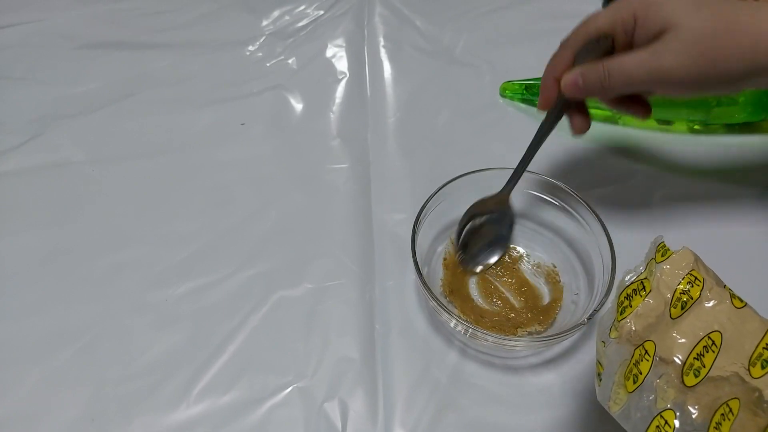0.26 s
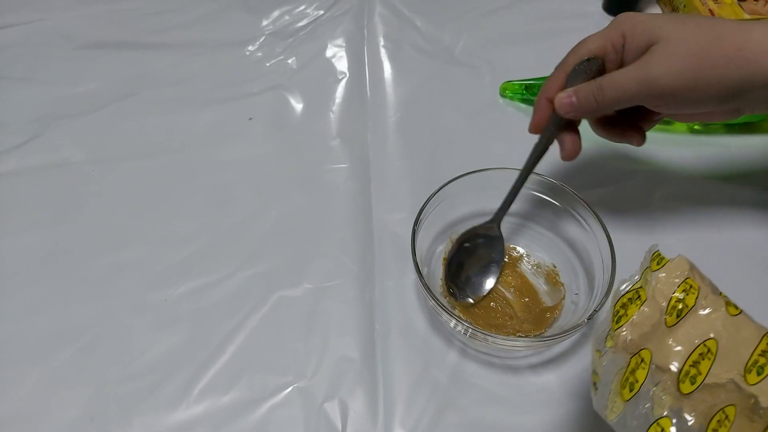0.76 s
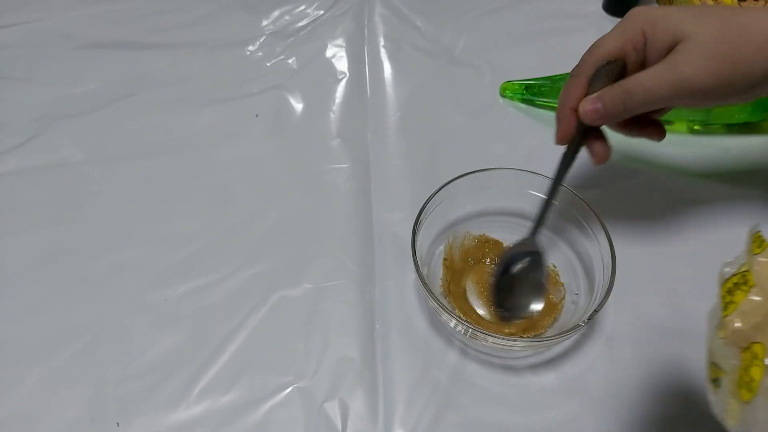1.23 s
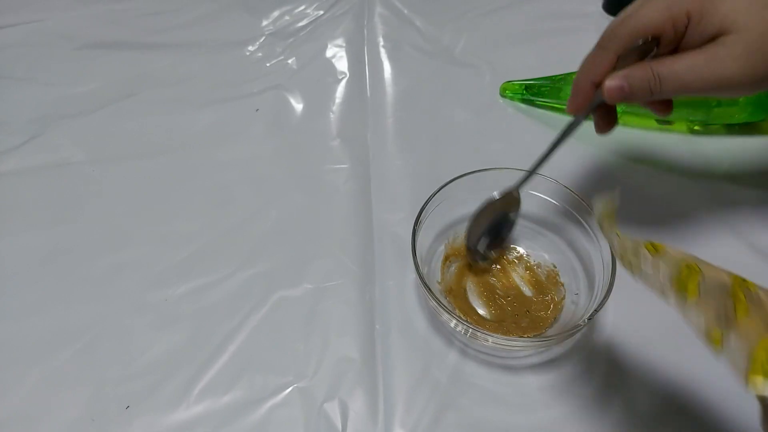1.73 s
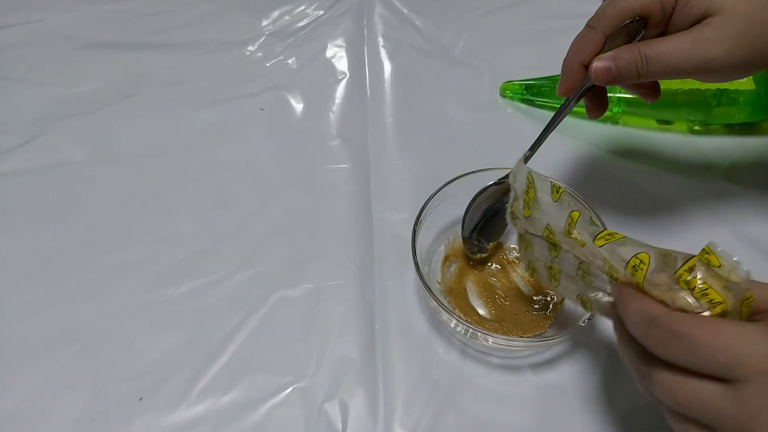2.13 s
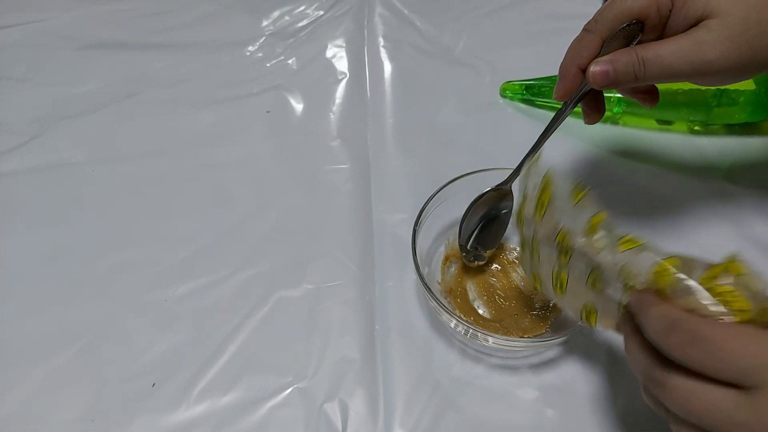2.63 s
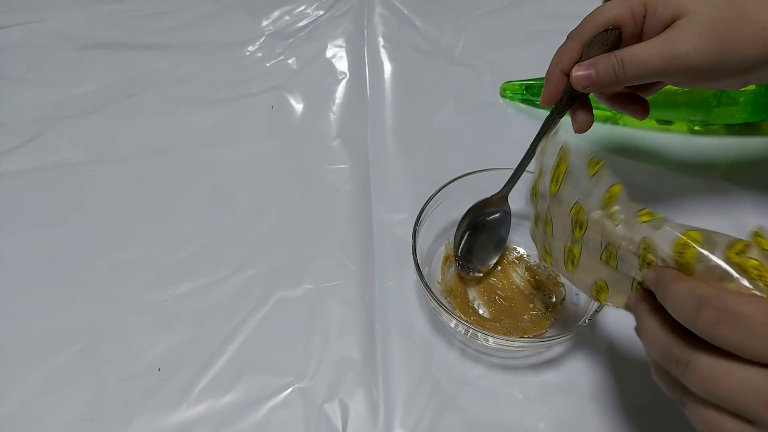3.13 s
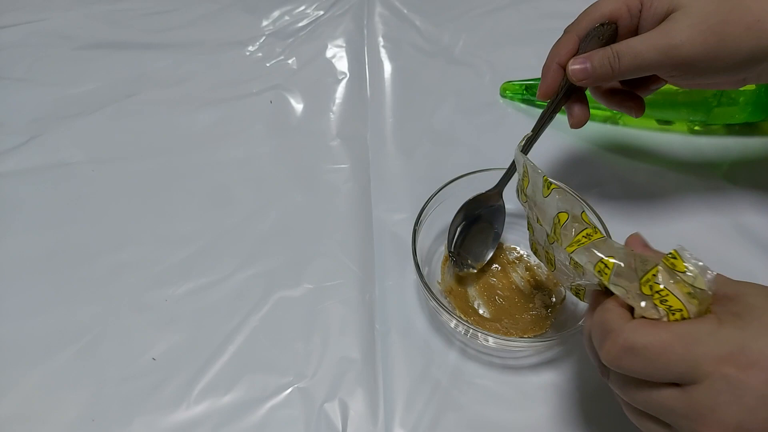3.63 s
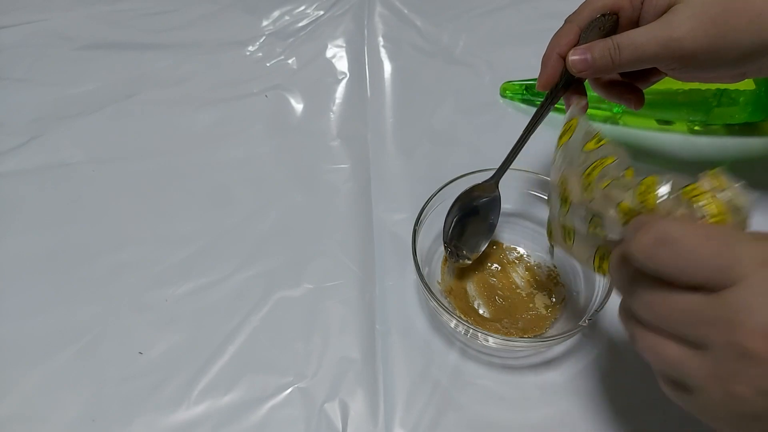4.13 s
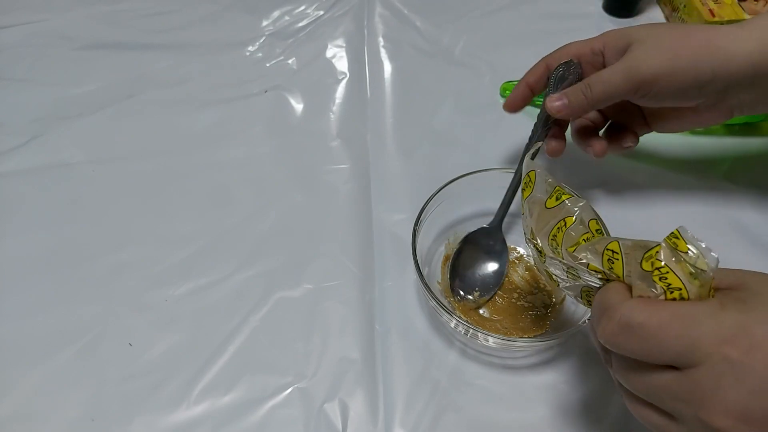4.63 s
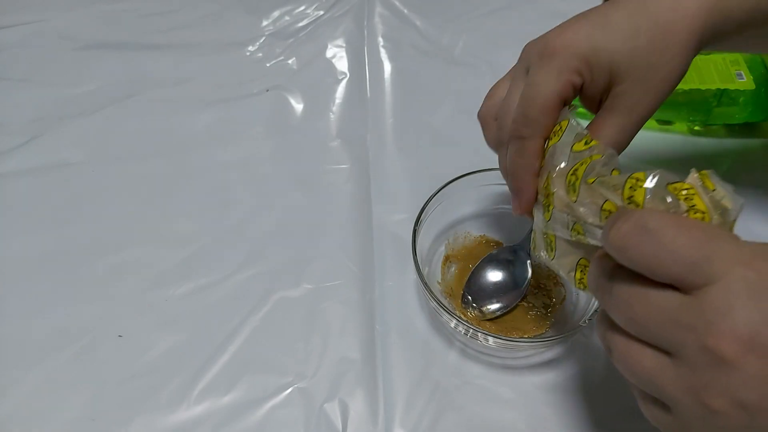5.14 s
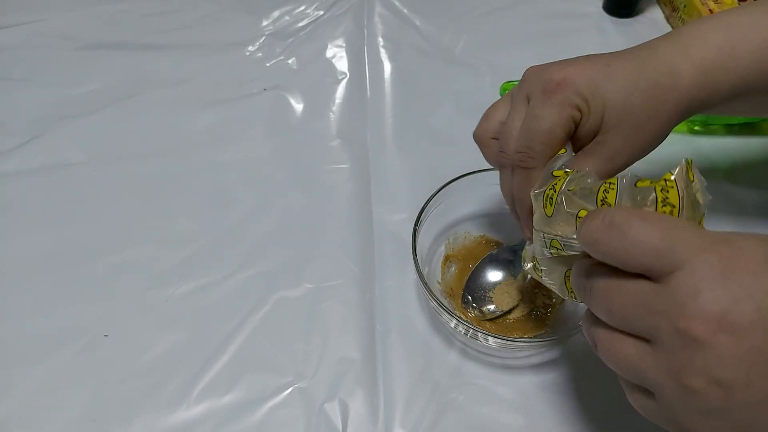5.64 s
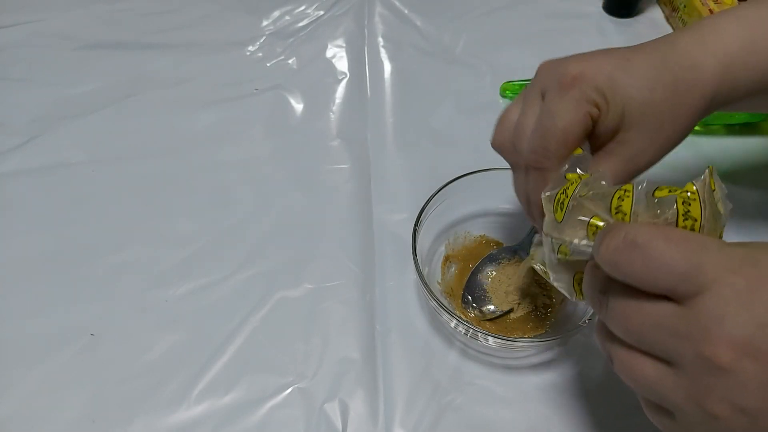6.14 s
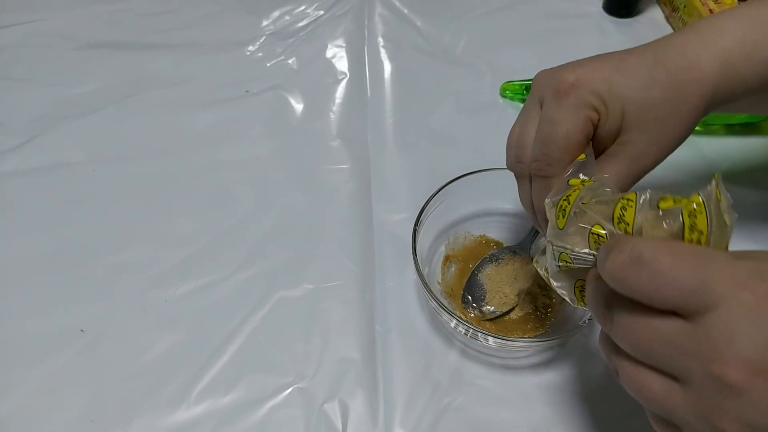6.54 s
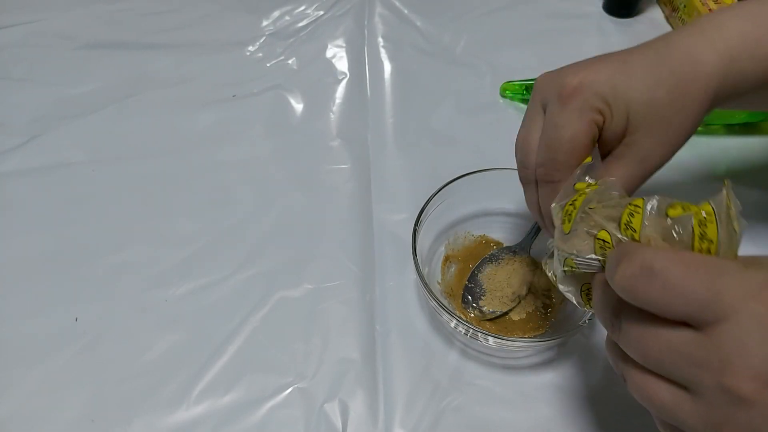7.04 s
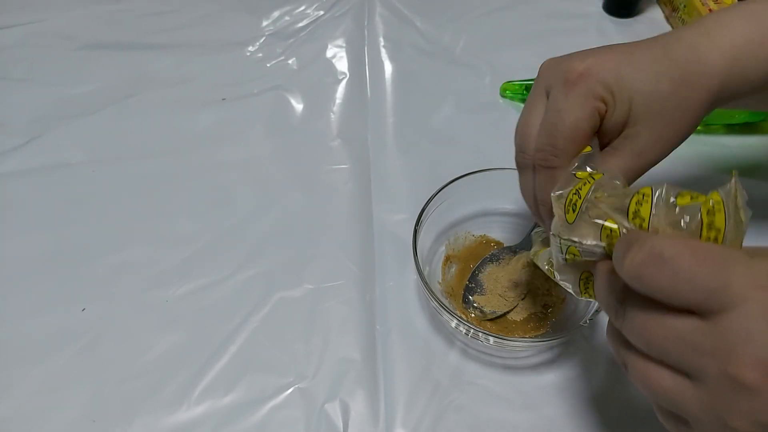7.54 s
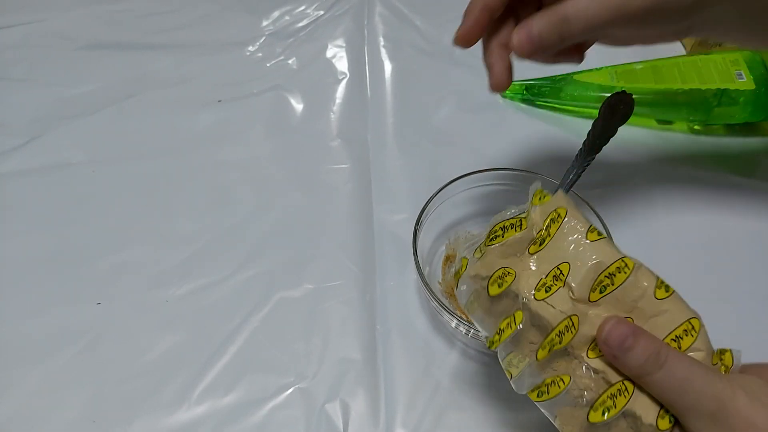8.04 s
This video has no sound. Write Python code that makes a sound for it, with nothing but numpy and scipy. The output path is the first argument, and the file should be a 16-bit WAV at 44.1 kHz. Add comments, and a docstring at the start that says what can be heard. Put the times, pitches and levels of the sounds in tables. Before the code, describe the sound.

Gritty spoon strokes and small taps in a glass bowl come first, ending with a clink on its wall. Light plastic shakes follow, growing into dense crackling, then three quick chattering steel-on-glass clinks. After another burst of crisp film snaps, the packet is squeezed about six times a second, growing stronger, then lifted away with slight rustles. Close stereo pickup, short room echo, low hum and faint hiss.

```python
"""A plastic packet is tipped over a glass bowl and squeezed in pulses: its creases snap and rustle.
Each snap is a click with a dying flutter; fine crumpling is many small ones at random moments.
A steel spoon stirs paste in the bowl, knocks its wall and is let go on the rim: short bursts
pass through the damped spoon's resonances, and decaying sines make the ring of glass and steel.
A motor hums over rumble and hiss in a small room; two microphone ports listen from close above."""
import sys
import numpy as np
from scipy import signal
from scipy.fft import rfft, irfft
from scipy.io import wavfile

SR = 44100
rng = np.random.default_rng(int(sys.argv[2]) if len(sys.argv) > 2 else 0)


def output_pcm(signal):
    """Save a mono or channel-first signal as 16-bit PCM at the path in sys.argv[1].

    Samples are clipped to [-1, 1] before scaling.
    """
    pcm = np.clip(np.atleast_2d(signal).T, -1, 1) * 32767
    wavfile.write(sys.argv[1], SR, np.round(pcm).astype(np.int16))


N = 365148

# Tone of the plastic film, also used for the rasp of the spoon's edge: (pitch_hz, gain_db)
FILM_TONE = [(120, -18), (330, -18), (650, -16), (1000, -11.5), (1600, 1), (1980, 1), (2350, 5),
             (4200, 7.5), (6000, 4), (7600, 3.5), (9800, -7), (12000, -4), (15500, -7.5)]
# Squeezes that coax the powder out, about six a second: (start_s, energy_db,
# highs_against_mids_db, tightening_crease_energy_db, spring_back_s, spring_back_energy_db)
SQUEEZES = [(5.7616, -2.5, -6.5, -25, 5.8451, -0.5), (5.9644, 1, -5.5, -13.5, 6.0532, -8),
            (6.109, 0.5, -6.5, -23, 6.1903, -5.5), (6.275, 2.5, -10, -4.5, 6.3795, 1),
            (6.4761, 1, -10, -2, 6.5709, -4.5), (6.6312, 3.5, -3, -27, 6.7372, -4),
            (6.7964, 3, 0.5, -13, 6.892, -6), (6.965, 6, -0.5, -5.5, 7.048, -1.5),
            (7.138, 6, -5.5, -6.5, 7.2158, -1), (7.3082, 6.5, -5.5, -4.5, 7.4091, -7),
            (7.4757, 5, -3.5, -6.5, 7.553, -4.5), (7.6553, -1.5, 0.5, -3.5, 7.757, -11)]
# Strokes of the spoon through the paste: (start_s, length_s, level_db before layer gains, groan_hz)
STROKES = [(0, 0.0067, -37, 3600), (0.084, .022, -40.5, 1730), (0.213, 0.068, -51, 3640),
           (0.325, 0.075, -39, 3660), (0.566, 0.13, -47.5, 2980), (0.701, 0.07, -56.5, 3600),
           (0.867, 0.2, -59, 3400), (1.044, 0.037, -42.5, 4230), (1.181, 0.051, -45, 4630),
           (1.46, .12, -50.5, 3300), (1.608, 0.057, -47.5, 3570)]


def amp(db):
    """Turns decibels into gain."""
    return 10 ** (np.asarray(db) / 20)


def unit(x):
    """Scales each channel of a sound to energy one."""
    return x / np.sqrt(np.sum(x ** 2, -1, keepdims=True) + 1e-20)


def read(points, hz):
    """Reads a (pitch_hz, value) table with straight lines on a log-frequency axis."""
    f, value = np.transpose(points)
    return np.interp(np.log(hz + 1), np.log(f + 1), value)


def level(rows):
    """Turns (time_s, level_db) points into gain for every sample, silent outside their span."""
    s, db = np.transpose(rows)
    return np.interp(np.arange(N) / SR, s, amp(db), left=0, right=0)


def pushes(rows, attack_s, release_s):
    """Pushes of the hand (start_s, length_s, level_db) as gain: each builds up, holds and dies away."""
    t = np.arange(N) / SR
    total = np.zeros(N)
    for s, length, db, *_ in rows:
        build_up = np.clip((t - s) / attack_s, 0, 1)
        die_away = np.exp(-np.maximum(t - s - length, 0) / release_s)
        total += amp(db) * build_up * die_away
    return total


def add(mix, s, sound):
    """Mixes a sound into both channels at time s."""
    part = mix[:, max(round(s * SR), 0):][:, :sound.shape[1]]
    part += sound[:, :part.shape[1]]


def convolve(x, response):
    """Filters both channels and keeps the scene's length."""
    return signal.oaconvolve(x, response, axes=1)[:, :N]


def causal(gain):
    """Minimum-phase spectrum with this gain, so that a filtered click starts at once."""
    both_sides = np.r_[gain, gain[-2:0:-1]]
    log_gain = np.log(np.maximum(both_sides, 1e-5))
    return np.exp(np.conj(signal.hilbert(log_gain)))[:len(gain)]


def bins(size=2048):
    """Frequencies of a short spectrum, in Hz."""
    return np.fft.rfftfreq(size, 1 / SR)


def burst(decay_s, spike, alike_hz=2600, lag_ms=0.093, size=2048):
    """Spectra of a click and its dying flutter at both ports: alike in the bass, later on the left."""
    t, hz = np.arange(size) / SR, bins(size=size)
    envelope = np.exp(-t / decay_s) * (1 - np.exp(-t * SR / 10))
    flutter = unit(rng.standard_normal((3, size)) * envelope)
    flutter[:, 2] += spike  # the first crack, early in the flutter
    z = rfft(flutter)
    # the third flutter is shared; the other two belong to one port each
    same = 1 / np.sqrt(1 + (hz / alike_hz) ** 2)
    z = same * z[2] + np.sqrt(1 - same ** 2) * z[:2]
    z[0] *= np.exp(-2j * np.pi * hz * lag_ms / 1e3)
    return z


def grains(per_s, spread_db):
    """Random clicks of very uneven size, with mean power one."""
    size = amp(spread_db * np.minimum(rng.exponential(1, N), 3.5))
    return np.sqrt(N) * unit(size * (rng.random(N) < per_s / SR))


def snap(low_db, high_db, decay_s):
    """One crease flips: large slack facets sound low, small taut ones bright."""
    hz = bins()
    z = burst(decay_s, spike=.8) * causal(amp(read(FILM_TONE, hz)))
    power = np.mean(abs(z) ** 2, 0)
    # energy in the lows, mids and highs, then tilt towards the wanted balance
    low, mid, high = 10 * np.log10(np.bincount(np.digitize(hz, [1800, 6000]), power))
    slack, taut = low_db - low + mid, high_db - high + mid
    tilt = [(650, 1.42 * slack), (1250, 0.85 * slack), (2400, 0.027), (4800, 0.0074), (7500, taut)]
    return unit(irfft(z * causal(amp(read(tilt, hz)))))


def squeeze_snaps():
    """Each squeeze tightens the film, flips one big crease and lesser ones, then lets it spring back."""
    # Lesser creases as the film starts to yield, buckles further and settles:
    # (after_squeeze_s, energy_against_squeeze_db, highs_against_mids_db)
    lesser_creases = [(-.003, -22.5, -17), (0.0176, -9.5, -3.5), (.128, -11, -10)]
    tighten_s, scatter_s = .0245, 0.00062  # lead of the tightening crease; scatter of the lesser ones
    tighten_high_db, spring_high_db = -4, -3.5  # highs against mids
    taut_low_db, low_spread_db = -13.5, 2.5  # lows against mids, and their random spread
    creases = []
    for s, db, high_db, tighten_db, back_s, back_db in SQUEEZES:
        creases.append((s - tighten_s, tighten_db, tighten_high_db))
        creases.append((s, db, high_db))
        creases.append((back_s, back_db, spring_high_db))
        for after_s, lesser_db, bright_db in lesser_creases:
            lesser_s = s + after_s + scatter_s * rng.standard_normal()
            creases.append((lesser_s, db + lesser_db, bright_db))
    return [(s, db, taut_low_db + low_spread_db * rng.standard_normal(), high_db)
            for s, db, high_db in creases]


def packet(knock_s=0.0045, neighbour_db=-13, delay_s=0.0066):
    """Creases of the film snap loudly; its whole bulging wall knocks as short dying sines."""
    # Loudest creases as the packet is turned and gripped:
    # (start_s, energy_db, lows_against_mids_db, highs_against_mids_db)
    loud_snaps = [(1.953, -20, -38, 13), (2.714, -18, 8.5, 2), (2.9418, -18, 8.5, -10),
                  (3.011, -16, 5.5, -11), (3.2069, -15, 5, -10), (3.2582, -11.5, 6, -4),
                  (3.3465, -15, 1.5, -12), (3.3791, 0.5, 0.5, 2.5), (3.3941, -2, -9.5, -3),
                  (3.4382, -8, 7, -4), (3.4594, -10, 4, -5), (3.525, -5, 2, -6), (3.608, -4.5, 1, -3),
                  (3.621, 5, -4.5, -7.5), (3.669, -5, -16, -5), (3.6988, -5, -4.5, -2),
                  (3.7446, -5, -1.5, -10), (3.841, 4, -4.5, -6.5), (3.8629, 5.5, -1.5, -6),
                  (3.8888, 1.5, -8, -8), (3.9167, 0.5, 1, -13), (4.0232, -11, 0, -10.5),
                  (4.069, -1, -10, -4), (4.1784, .5, -6.5, -6), (4.521, -13, -9, -14.5),
                  (5.1803, -12.5, 2, -29), (5.2549, -10, 2, 0), (5.271, -5.5, -2, -15),
                  (5.2911, 4.5, -1.5, -10.5), (5.3297, -5.5, -3, -17), (5.3435, 0.5, -8, 0),
                  (5.345, 7, -11, -7.5), (5.3616, -2, -2, -17), (5.3764, 0, -8, 0),
                  (5.418, -4.5, -24, -6.5), (5.519, -9, -13, -6), (5.5274, 7, -11, -10),
                  (5.551, 0.5, -11, -3.5), (7.9113, -12, 2, -23), (8.1039, -16, -1, -3)]
    # Soft knocks of the bulging packet as the powder shifts: (start_s, energy_db, pitch_hz)
    knocks = [(2.2438, -15.5, 600), (2.456, -19, 630), (2.514, -25, 1720), (2.645, -23.5, 1750),
              (2.658, -21, 610), (3.012, -23, 584), (3.166, -19, 614), (4.025, -7.5, 793),
              (5.228, -14.5, 1550), (7.86, -14, 683)]
    out, t = np.zeros((2, N)), np.arange(2048) / SR
    for s, db, low_db, high_db in loud_snaps + squeeze_snaps():
        add(out, s, amp(db) * snap(low_db, high_db, decay_s=0.0024))
        # each snap tips a neighbouring crease a moment later
        wait, size = rng.exponential(1), rng.uniform(.5, 2)
        neighbour = snap(low_db, high_db, decay_s=.001)
        add(out, s + delay_s * wait, size * amp(db + neighbour_db) * neighbour)
    for s, db, hz in knocks:
        knock = np.sin(2 * np.pi * hz * t) * np.exp(-t / knock_s)
        add(out, s, amp(db) * unit(knock)[None])
    return out


def crumple(effort, level_db, low_db, high_db, per_s, count=9):
    """Tiny creases, each with its own colour, give way as the fingers work the film."""
    out = np.zeros((2, N))
    clicks = effort * grains(per_s, spread_db=6.5)
    which = rng.integers(count, size=N)
    for k, (low, high) in enumerate(rng.standard_normal((count, 2))):
        crease = snap(low_db + 5 * low, high_db + 5 * high, decay_s=.0009)
        out += convolve((clicks * (which == k))[None], crease)
    return out * amp(level_db)


def packet_rustle():
    """Fine crumpling of the film follows the effort of the hands: shaken, loose, held or taut."""
    # Light shakes of the tipped packet: (start_s, length_s, level_db before layer gain)
    shakes = [(2.193, .014, -53.5), (2.3, 0.019, -47.5), (2.44, 0.02, -44.5), (2.51, 0.016, -56),
              (2.58, 0.022, -52), (2.64, 0.018, -55), (2.705, 0.028, -52), (3.0, 0.016, -53),
              (3.25, 0.013, -49)]
    # Gathering in one hand, gripping with the other, lifting away: (time_s, level_db before layer gain)
    gathering = [(3.17, -59), (3.365, -71), (3.41, -46), (3.57, -54), (3.9, -45), (4.05, -46.5),
                 (4.28, -66)]
    gripping = [(5.1, -58.5), (5.21, -56), (5.35, -39), (5.48, -49), (5.54, -44), (5.66, -75)]
    lifting = [(7.7, -73), (7.82, -53), (7.97, -75), (8.2, -66.5), (8.26, -52)]
    lead_s, length_s = 0.012, 0.026  # each squeeze's rustle starts just before its snap
    squeeze_rows = [(s - lead_s, length_s, db) for s, db, *_ in SQUEEZES]
    squeezing = pushes(squeeze_rows, attack_s=0.0066, release_s=0.16)
    shaking = pushes(shakes, attack_s=0.0023, release_s=0.017)
    holding = level(gripping) + level(lifting)
    shaken = crumple(shaking, level_db=3.5, low_db=3, high_db=-5.5, per_s=1500)
    loose = crumple(level(gathering), level_db=5, low_db=-4.5, high_db=-10.5, per_s=340)
    held = crumple(holding, level_db=2, low_db=-3, high_db=-7.5, per_s=300)
    taut = crumple(squeezing, level_db=-47.5, low_db=-5.5, high_db=-6, per_s=110)
    return shaken + loose + held + taut


def ring(place, damping=0):
    """Modes of glass and steel, weighted by where the blow lands; contact damps them (per s)."""
    # Ring of bowl and spoon together: (pitch_hz, time_to_fall_60_db_s, wall_blow_db, rim_blow_db)
    ring_modes = [(945, .6, -12, -20), (1340, .2, -5, -14), (2220, .36, -15, -4), (2455, .1, -18, 3),
                  (4002, .28, 0, -2), (4700, .08, -10, 0), (6112, .25, -12, 1), (6290, .13, 2, -12),
                  (6820, .06, -11, 2), (7580, .1, -1, -1), (8548, .2, -15, -3), (10280, .14, -7, -10),
                  (11060, .16, -11, -2), (11330, .05, -11, 1), (12550, .05, -2, -14), (13825, .15, 2, -4),
                  (14580, .09, -12, 2), (15150, .15, -6, -5)]
    t = np.arange(SR) / SR
    phases = 2 * np.pi * rng.random((len(ring_modes), 2, 1))
    modes = np.zeros((2, SR))
    for (hz, t60, wall, rim), phase in zip(ring_modes, phases):
        fading = amp(wall + place * (rim - wall) - 60 * t / t60)
        modes += fading * np.sin(2 * np.pi * hz * t + phase)
    return unit(modes * np.exp(-damping * t))


def clinks(ring_db=-8, clack_db=-1, chatter_per_s=600, damping=330, rasp=0.66, body_db=7, size=8192):
    """Steel meets glass in a buzz of tiny rebounds: a choked clack at each, then the free ring."""
    # Spoon striking the glass: (start_s, energy_db before layer gains, chatter_s, place 0 wall to 1 rim)
    strikes = [(1.4322, 1, .0015, 0), (4.6562, -1, .02, 1), (4.7201, -2.5, .021, 1), (4.7894, -3, .026, 1),
               (4.9066, -19, .008, 1)]
    out, t = np.zeros((2, N)), np.arange(size) / SR
    body = read([(900, body_db), (2500, 0)], bins())  # the bowl's weight fills out the low end
    for s, db, chatter_s, place in strikes:
        rebounds = rng.standard_normal(size) * (rng.random(size) < chatter_per_s / SR)
        rebounds[0] = 2
        rebounds = (rebounds * np.exp(-t / (2 * chatter_s)))[None]
        # the handle's edge rasps on the rim; on the wall the blow is cleaner
        edge_colour = causal(amp(read(FILM_TONE, bins()) + body))
        edge = unit(irfft(burst(decay_s=0.0084, spike=1.0) * edge_colour))
        clack = ring(place, damping)[:, :edge.shape[1]] + rasp * (1 + 2 * place) / 2 * edge
        add(out, s, amp(db + clack_db) * unit(convolve(rebounds, clack)))
        # the ring builds up while the chatter lasts
        build = 1 - np.exp(-np.arange(SR) / SR / (.5 * chatter_s))
        add(out, s, amp(db + ring_db) * unit(ring(place) * build))
    return out


def spoon_colour(treble_db, shift=0.015, uneven_db=-1.5):
    """Damped resonances of the held spoon; they shift with each point of contact."""
    # Broad resonances of the spoon pressed on the glass,
    # before random shifts: (pitch_hz, width_hz, gain_db)
    spoon_modes = [(1245, 44, 4.5), (1344, 34, -0.5), (2840, 650, -1.5), (3790, 740, 2), (4500, 190, -23),
                   (5300, 1000, 0), (6100, 210, -5), (7140, 700, -1.5), (8460, 190, -3), (11370, 170, -8),
                   (12800, 150, -2), (14500, 760, -6)]
    hz = bins()
    power = np.zeros(len(hz))
    for (f, width, db), (a, b) in zip(spoon_modes, rng.standard_normal((len(spoon_modes), 2))):
        off_pitch = (hz ** 2 - (f * (1 + shift * a)) ** 2) / (width * hz + 1)
        power += amp(db + uneven_db * b) ** 2 / (1 + off_pitch ** 2)
    treble = amp(read([(4500, 0), (11000, treble_db)], hz))
    return causal(np.sqrt(power) * treble)


def groans(bite_db=36, groan_s=0.0014):
    """Under real pressure the spoon's edge bites and groans, at a pitch set by where it touches."""
    out, t = np.zeros((2, N)), np.arange(1024) / SR
    for s, length, db, hz in STROKES:
        # squared, so that a light touch hardly groans
        bite = pushes([(s, length, db)], attack_s=0.0051, release_s=0.0094) ** 2
        slips = bite * grains(per_s=740, spread_db=5.5)
        groan = unit(np.sin(2 * np.pi * hz * t) * np.exp(-t / groan_s))
        out += convolve(slips[None], groan[None])
    return out * amp(bite_db)


def stirring(tap_db=12, scrape_db=-3, ring_db=-21, hard_db=13, skid_db=-32, contacts_per_s=35, count=4):
    """The spoon taps and grinds from one gritty spot to the next; the bowl rings faintly with it."""
    # Spoon tapping the bottom of the bowl: (start_s, level_db before tap_db, treble_db before hard_db)
    bowl_taps = [(0.092, -21, -19), (0.116, -18, -19), (0.378, -10, -17.5), (0.467, -20, -13),
                 (0.4972, -22, -14), (0.5756, -18, -5), (1.0786, -19.5, -15), (1.109, -20.5, -21),
                 (1.17, -26, -22), (1.2094, -24.5, -9), (1.255, -26.5, -18), (1.313, -35.5, -16),
                 (1.358, -30, -14)]
    out, pressure = groans(), pushes(STROKES, attack_s=0.0049, release_s=0.017)
    for s, db, treble_db in bowl_taps:
        tap = irfft(burst(decay_s=0.0024, spike=0.11) * spoon_colour(treble_db + hard_db))
        add(out, s, amp(db + tap_db) * unit(tap))
    # the contact moves on at random moments, round a few spots
    spot = np.cumsum(rng.random(N) < contacts_per_s / SR) % count
    for k in range(count):
        slips = (spot == k) * grains(per_s=580, spread_db=1.0)[None]
        grind = unit(irfft(burst(decay_s=0.00067, spike=0.092) * spoon_colour(treble_db=-1.5)))
        out += amp(scrape_db) * convolve(pressure * slips, grind)
        # a thin bright skid stays even where the touch is light
        skid = unit(irfft(burst(decay_s=0.00013, spike=0.72) * spoon_colour(treble_db=6)))
        out += amp(skid_db) * convolve(np.sqrt(pressure) * slips, skid)
    return out + amp(ring_db) * convolve(out, ring(place=0.66))


def room(x, wet_db, wall_s=0.018, size=24000):
    """Adds a tail of dense random echoes that swells when the walls answer; the bass lasts longest."""
    # Room decay: (pitch_hz, time_to_fall_60_db_s)
    decay_times = [(300, 0.91), (1500, 0.34), (4000, 0.22), (8000, 0.16), (15000, 0.18)]
    t = np.arange(size) / SR
    echoes = rng.standard_normal((2, size)) * (rng.random((2, size)) < .15)
    echoes = echoes * np.where(t < wall_s, .6, 1)
    hz, at, z = signal.stft(echoes, SR, nperseg=256)
    colour_db = read([(5000, -2.0), (14000, 7)], hz)[:, None]
    fall_db = 60 * at / read(decay_times, hz)[:, None]
    tail = signal.istft(z * amp(colour_db - fall_db), SR, nperseg=256)[1]
    return x + amp(wet_db) * convolve(x, unit(tail))


def ports(x):
    """The left port hears the table top louder than the right, by an amount that varies with pitch."""
    # Level of the left port over the right: (pitch_hz, lead_db)
    left_lead = [(500, 1.8), (1000, 1.3), (2000, 2), (4000, 4), (8000, 0.5), (12500, 6)]
    lead_db = read(left_lead, np.fft.rfftfreq(N, 1 / SR))
    return irfft(rfft(x) * amp([lead_db / 2, -lead_db / 2]), N)


def background(shaft_hz=38.83):
    """A motor hums at multiples of its shaft speed, over noise shaped into rumble and faint hiss."""
    # Motor hum: (multiple_of_shaft_speed, rms_level_db)
    hum_parts = [(2, -55.5), (3, -38), (4, -53), (5, -52.5), (6, -60)]
    # Room rumble and hiss: (pitch_hz, level_db per Hz)
    air_noise = [(25, -99), (52, -72.5), (75, -65), (130, -68), (164, -76), (176, -58), (203, -76),
                 (300, -81), (520, -84), (800, -101), (2000, -106), (4000, -106), (9000, -113),
                 (15500, -114)]
    t, hz = np.arange(N) / SR, np.fft.rfftfreq(N, 1 / SR)
    # slow random sway of the hum's level
    slow_noise = irfft(rfft(rng.standard_normal(N)) / (1 + (hz / 2) ** 2), N)
    sway = np.sqrt(N) * unit(slow_noise)
    hum = np.zeros(N)
    for k, db in hum_parts:
        turns = round(k) * shaft_hz * t + rng.random()
        hum += amp(db) * np.sqrt(2) * np.sin(2 * np.pi * turns)
    # part of the noise is shared by both ports, most of it in the bass
    z = rfft(rng.standard_normal((3, N)))
    same = np.clip(read([(180, 0.87), (400, 0.76), (1000, 0.063), (3000, 0.22)], hz), 0, 1)
    mixed = np.sqrt(same) * z[2] + np.sqrt(1 - same) * z[:2]
    noise = irfft(mixed * amp(read(air_noise, hz)), N)
    return hum * (1 + .05 * sway) + noise * np.sqrt(SR / 2)


def scene():
    """Packet and spoon sound in the same room, over the background."""
    packet_in_room = room(packet() + packet_rustle(), wet_db=-6.0)
    spoon_in_room = room(stirring() + clinks(), wet_db=-4.0)
    return ports(packet_in_room + spoon_in_room) + background()


def record(dry, edge_hz=15950):
    """Clips at full scale, then cuts off the treble above the band edge."""
    low_pass = signal.firwin(255, edge_hz, window=("kaiser", 8), fs=SR)
    return signal.oaconvolve(np.clip(dry, -1, 1), low_pass[None], "same")


dry = scene()
out = record(dry)
output_pcm(out)
```